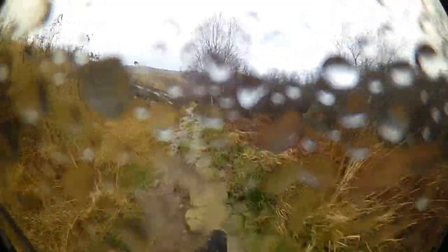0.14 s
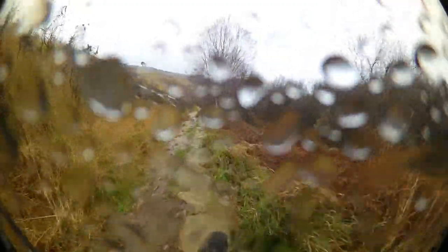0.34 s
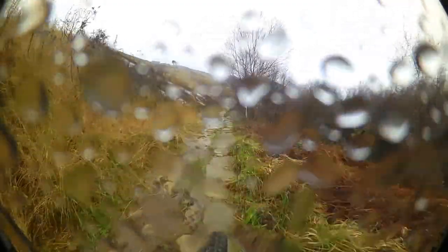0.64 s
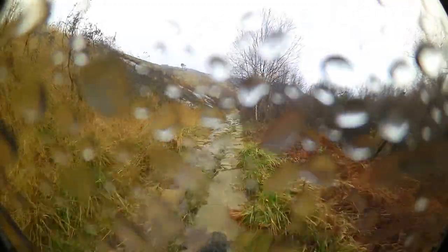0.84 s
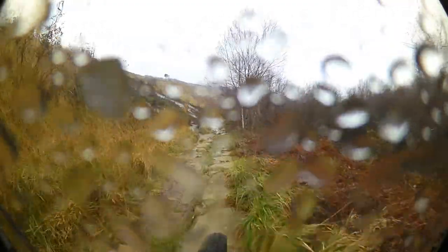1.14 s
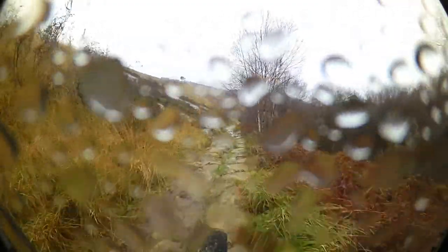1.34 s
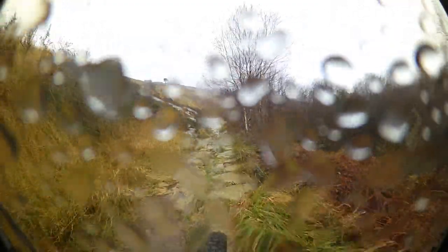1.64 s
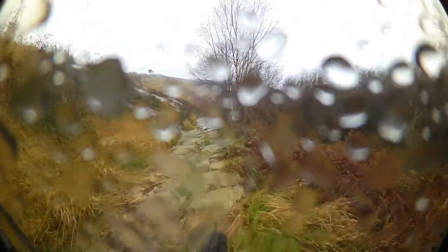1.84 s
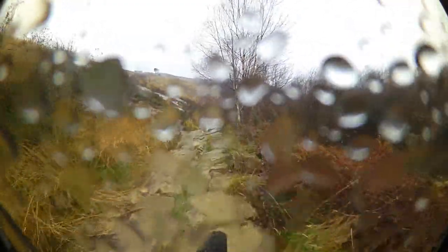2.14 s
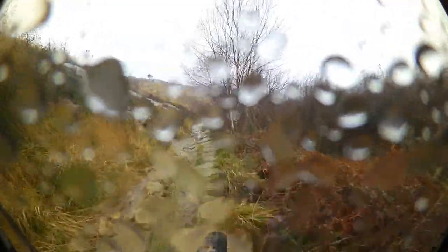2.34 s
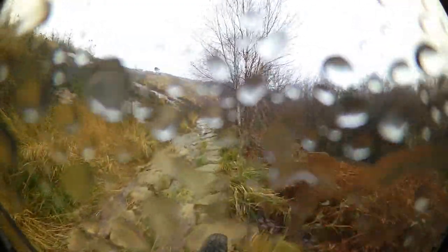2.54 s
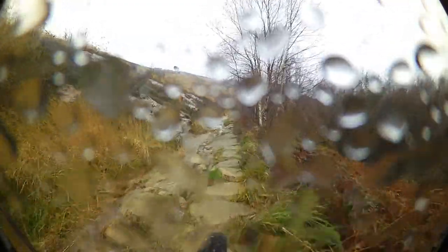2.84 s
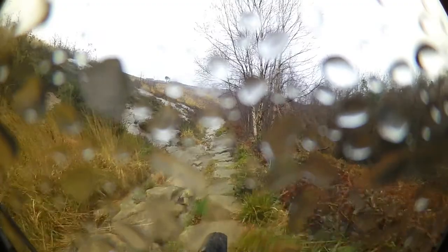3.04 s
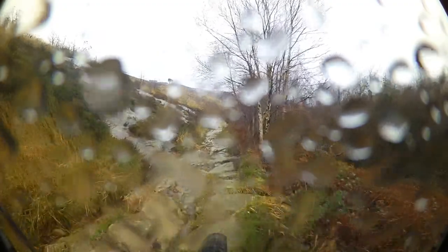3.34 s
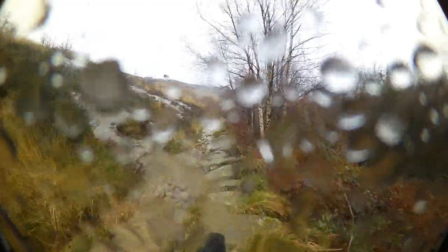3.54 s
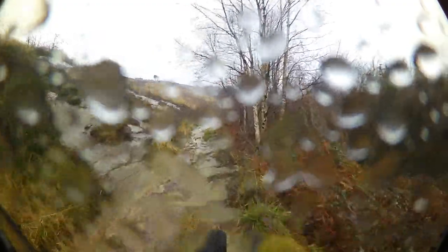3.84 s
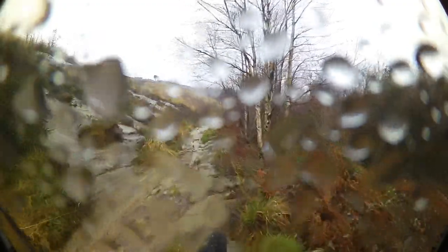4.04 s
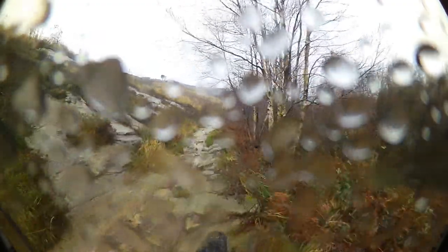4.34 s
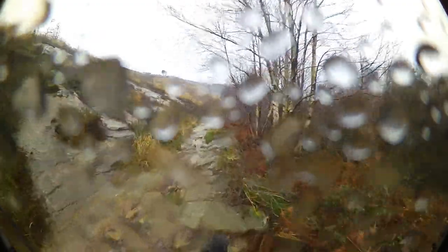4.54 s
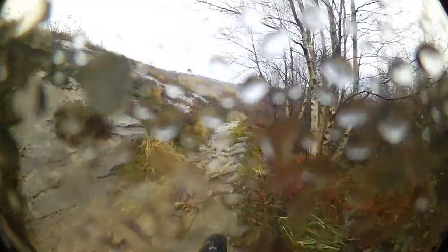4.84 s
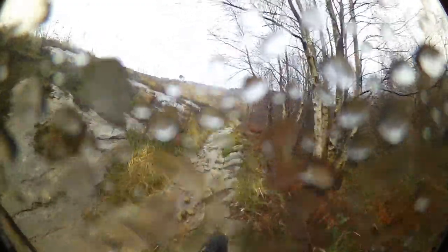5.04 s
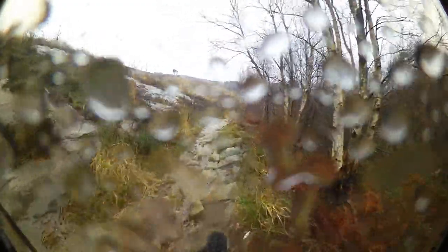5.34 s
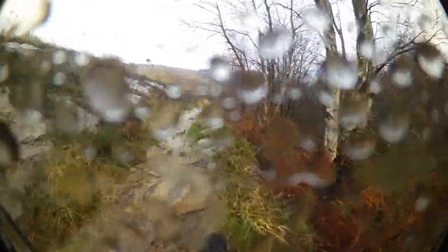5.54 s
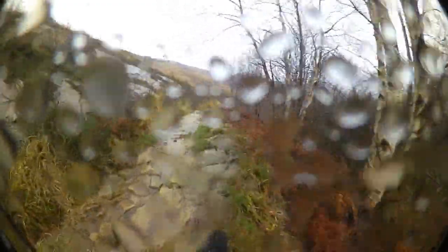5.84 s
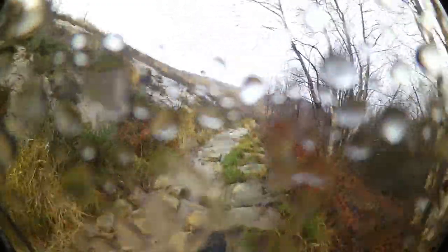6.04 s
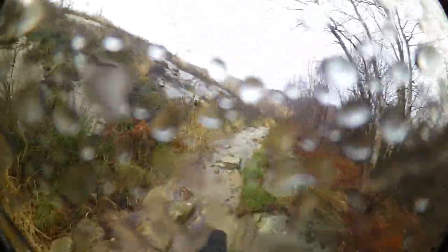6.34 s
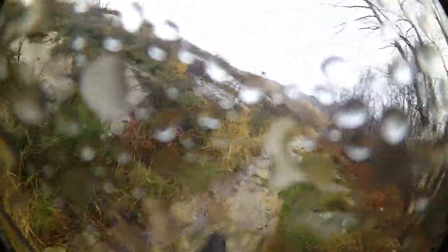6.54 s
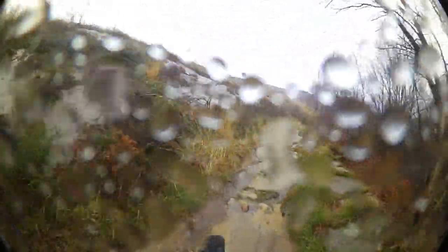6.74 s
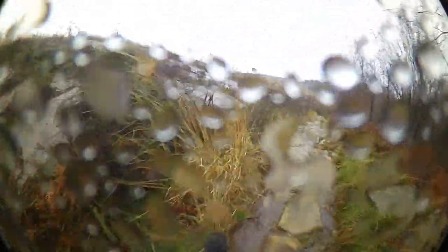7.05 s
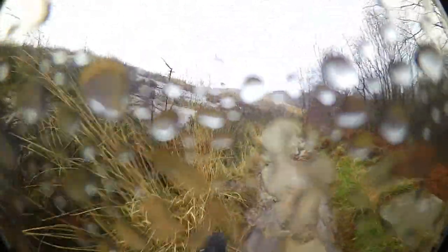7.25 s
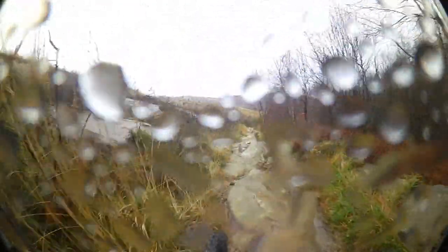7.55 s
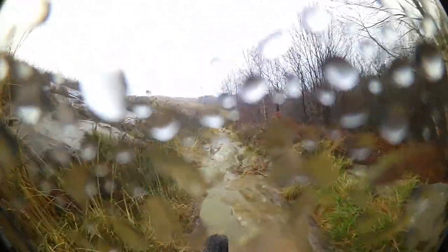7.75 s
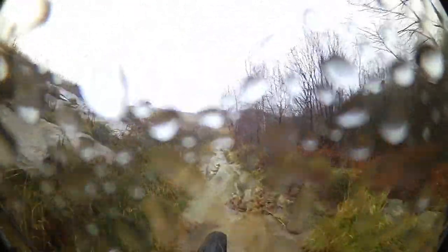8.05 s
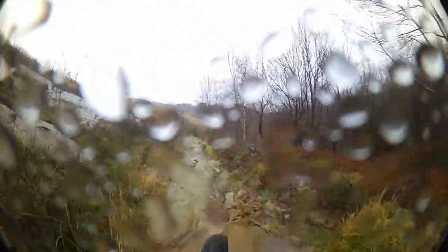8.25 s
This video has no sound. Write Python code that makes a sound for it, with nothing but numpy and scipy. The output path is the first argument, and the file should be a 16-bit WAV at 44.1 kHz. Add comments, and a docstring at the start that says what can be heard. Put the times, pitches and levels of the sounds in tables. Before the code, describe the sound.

Wet bicycle brakes squeal in stuttering bursts while tyres rumble and crunch down a stony trail, stones knocking hard, heard from inside a small case.

```python
"""Down a wet stony trail rolls a mountain bike, heard from inside a small waterproof case on the rider.
Shaped random grains make the tyres rumble and crunch and give short gritty scrapes; stones knock the case modes.
Partials of half the squeal pitch and noise form the stuttering wet brake, with a low disc hum beneath.
Noise bursts tick on the case and the chain jingles; a tyre squeaks once, and later pebbles clack.
A limiter holds the peaks."""
import sys
import numpy as np
from scipy.fft import rfft, irfft, next_fast_len
from scipy.io import wavfile
from scipy.ndimage import uniform_filter1d, minimum_filter1d, map_coordinates

SR = 44100
rng = np.random.default_rng(int(sys.argv[2]) if len(sys.argv) > 2 else 0)


def master(y):
    """Save y as 16-bit WAV."""
    cut = np.clip(np.atleast_2d(y).T, -1, 1)
    pcm = np.round(cut * 32767)  # scale
    wavfile.write(sys.argv[1], SR, pcm.astype(np.int16))


N = 370862


def amp(db):
    """Decibels to gain."""
    return 10 ** (np.asarray(db) / 20)


def unit(x):
    """Scale to rms 1."""
    return x / np.sqrt(np.mean(x ** 2) + 1e-20)


def along(points, hz):
    """Interpolate (f/Hz, value) points on a log frequency axis."""
    f, v = np.transpose(points)
    return np.interp(np.log(hz + 1), np.log(f + 1), v)


def curves(rows):
    """One value per sample for each column after the time."""
    s, *cols = np.transpose(sorted(map(tuple, rows)))
    return [np.interp(np.arange(N) / SR, s, c) for c in cols]


def wobble(rate):
    """A smooth random curve, rate knots a second."""
    knots = rng.standard_normal(int(N * rate / SR) + 4)
    coarse = np.arange(0, N + 16, 16)
    return np.interp(np.arange(N), coarse, map_coordinates(knots, [coarse * rate / SR]))


def filtered(x, response):
    """Shape x by a response of frequency in Hz."""
    m = next_fast_len(N + SR // 4)
    return irfft(rfft(x, m) * response(np.fft.rfftfreq(m, 1 / SR)), m)[..., :N]


def add(track, s, sound):
    """Mix a sound into a track at time s."""
    part = track[..., max(round(s * SR), 0):][..., :sound.shape[-1]]
    part += sound[..., :part.shape[-1]]


def swell(s, length, attack, release, sag=0):
    """Level in dB that rises, holds with a sag in dB/s and dies; attack and release are s per 20 dB."""
    t = np.arange(N) / SR - s
    edges = np.maximum(-t, 0) / attack + np.maximum(t - length, 0) / release
    return -20 * edges - sag * np.clip(t, 0, length)


def grains(rate, spread_db, bed_db):
    """Tiny impacts of uneven size, rate per second, on a bed of noise."""
    size = amp(spread_db * np.minimum(rng.exponential(size=N), 4))
    hits = (rng.random(N) < rate / SR) * size * rng.choice([-1, 1], (2, N))
    return unit(hits) + amp(bed_db) * rng.standard_normal((2, N))


# stereo width of the noisy layers: (f/Hz, left-right likeness)
LIKENESS = [(100, .93), (1000, 0.99), (2500, 1), (4500, 0.84), (12000, .3)]


def coloured(pair, spectrum):
    """Two signals become a coloured stereo pair of rms 1, mixed as mid and side to set the width."""
    def response(hz):
        turn = np.arccos(np.clip(along(LIKENESS, hz), -1, 1)) / 2
        return amp(along(spectrum, hz)) * [np.cos(turn), np.sin(turn)]
    mid, side = filtered(pair, response)
    return unit(np.array([mid + side, mid - side]))


# narrow resonances that colour grit, scrapes and pebbles: (f/Hz, width/Hz, level/dB)
CASE_RESONANCES = [(1220, 100, 12), (1900, 260, 3), (2560, 110, 9)]


def hollow(x):
    """The narrow resonances of the case are added to a sound."""
    def response(f):
        return 1 + sum(amp(db) * 1j * f * w / (hz * hz - f * f + 1j * f * w)
                       for hz, w, db in CASE_RESONANCES)
    return filtered(x, response)


# course of the ride, before layer trims: (t/s, frame rumble level/dB, tyre crunch level/dB, grit level/dB)
RIDE_LEVELS = [(0.0, -32, -40.5, -60), (0.4, -16.5, -30, -52), (0.52, -32, -34.5, -50),
               (0.88, -33, -45.5, -69), (1.26, -24.5, -35, -57.5), (1.38, -33.5, -39, -60),
               (1.88, -38, -49.5, -72.0), (2.68, -29, -38.0, -62), (2.9, -32.5, -37, -57.5),
               (3.12, -31, -41.5, -65), (3.42, -23, -34, -54), (3.68, -32.5, -38.5, -55),
               (3.78, -27, -36, -55.5), (4.68, -37, -49, -71.5), (4.8, -28.5, -37.5, -61),
               (5.3, -24, -32.5, -58.5), (5.84, -35.5, -45.5, -59.5), (6.46, -18.5, -35, -57),
               (6.56, -30, -41.5, -63), (6.9, -26, -40.2, -59.5), (7.0, -21.5, -36, -54.9),
               (7.42, -16, -30.5, -53.5), (7.72, -34.3, -48, -60.5), (7.86, -37, -46.5, -58.5),
               (8.04, -21.5, -38.5, -56.5), (8.4, -31.5, -46.5, -62.5)]
# wheels roll over rocks, before layer trims: (t/s, half length/s, rumble level/dB, crunch level/dB)
ROCK_BUMPS = [(0.117, 0.03, -21, -29), (0.152, .02, -18.5, -37.5), (0.368, .01, -13, -45),
              (0.467, 0.041, -20, -25.5), (1.132, 0.018, -22, -33), (1.28, 0.016, -25.5, -39.5),
              (2.295, 0.013, -30.5, -45), (2.616, 0.022, -25, -43), (3.197, .025, -25.5, -40.5),
              (3.765, 0.0098, -17.5, -36), (4.573, 0.018, -28.5, -40), (4.912, .03, -21.5, -35.5),
              (5.114, 0.032, -21, -35), (5.336, 0.032, -23, -29.5), (5.482, 0.041, -27.5, -34.5),
              (5.663, 0.037, -17.5, -30), (5.801, 0.024, -27.5, -46), (5.988, 0.023, -25.5, -30.5),
              (6.107, 0.013, -24.5, -49.5), (6.309, 0.015, -15.5, -30), (6.408, 0.052, -21.5, -30.5),
              (6.712, .025, -22.5, -37.5), (6.957, .015, -16, -40.5), (7.041, .012, -14, -37),
              (7.189, 0.027, -21, -26.5), (7.366, .025, -17.5, -25), (7.748, 0.026, -31, -53),
              (8.038, 0.016, -18.5, -32.5), (8.127, 0.017, -28.5, -32.5)]
# colour of the frame rumble: (f/Hz, relative density/dB)
RUMBLE_COLOUR = [(20, -50.5), (40, -18.5), (68, -5), (105, -7), (165, 1), (190, 1), (218, 0), (270, -2),
                 (335, -4), (480, -10), (700, -34.5), (1200, -68)]
# colour of the tyre crunch: (f/Hz, relative density/dB)
CRUNCH_COLOUR = [(200, -20.5), (400, 2), (560, 5.5), (750, 2.5), (950, 0), (1180, 4), (1350, -2.5),
                 (1550, -11), (2000, -15.5), (3000, -57)]
# colour of the fine grit: (f/Hz, relative density/dB)
GRIT_COLOUR = [(900, -22.5), (1200, 3.5), (1480, 0), (1800, 2.5), (2250, 2), (2680, -6), (2900, -6),
               (3900, -11), (4700, -11.5), (5800, -23.5), (7000, -24), (8200, -20), (10500, -37),
               (12500, -47), (15800, -59)]


def tyres(crunch_db=7.5, grit_db=13, bump_grit_db=-28, jolt_db=2.5):
    """Knobbly tyres on wet stones: grains in three bands; shared jolts swell them at once."""
    t = np.arange(N) / SR
    rumble, crunch, grit = amp(curves(RIDE_LEVELS))
    rolls = [np.exp(-((t - s) / half) ** 2) for s, half, _, _ in ROCK_BUMPS]
    thump, scrunch = amp(np.transpose(ROCK_BUMPS)[2:]) @ np.array(rolls)
    jolts = jolt_db * wobble(55)

    def layer(source, colour, shake_db):
        return unit(amp(shake_db) * coloured(source, colour))

    frame = layer(grains(rate=470, spread_db=2.5, bed_db=-2.0), RUMBLE_COLOUR, .6 * jolts + 1.6 * wobble(40))
    stones = layer(grains(rate=400, spread_db=4.5, bed_db=2.5), CRUNCH_COLOUR, 1.39 * jolts)
    fine = hollow(grains(rate=350, spread_db=1, bed_db=2.0))
    sand = layer(fine, GRIT_COLOUR, jolts + 2 * wobble(100))
    # ride and bumps add as powers
    frame = np.hypot(rumble, thump) * frame
    stones = np.hypot(crunch, scrunch) * stones
    sand = np.hypot(grit, amp(bump_grit_db) * scrunch) * sand
    return frame + amp(crunch_db) * stones + amp(grit_db) * sand


# drops and grit hit the case, before trim and colour: (t/s, level/dB)
CASE_TICKS = [(0.3149, -28), (0.4545, -34.5), (1.2413, -35.5), (2.2646, -21.5), (2.6946, -41.5),
              (3.193, -37.5), (3.2451, -28.5), (3.398, -18), (3.469, -30), (3.5264, -34), (3.802, -25),
              (4.086, -27.5), (4.135, -23.5), (4.8525, -32.5), (5.1123, -30), (5.404, -39.5),
              (5.5944, -32.5), (5.6654, -38), (5.834, -35), (5.892, -33), (6.065, -47), (6.3468, -27),
              (6.536, -33), (7.0878, -27.5), (7.5516, -26.5), (7.9066, -24.5), (8.33, -38)]
# colour of a tick: (f/Hz, gain/dB)
TICK_COLOUR = [(600, -9), (1200, 7), (1900, 15.5), (2560, 12), (3300, -3.5), (4600, -2.5), (6300, -16),
               (8200, -6.5), (11000, -16), (15800, -19.5)]


def ticks(tick_db=-3, t60=0.023):
    """Drops and grit splat on the case: short noise bursts, mostly alike left and right."""
    out, t = np.zeros((2, N)), np.arange(SR // 10) / SR
    for s, db in CASE_TICKS:
        splat = rng.standard_normal(len(t)) + 0.26 * rng.standard_normal((2, len(t)))
        add(out, s, amp(db + tick_db - 60 * t / t60) * splat)
    return filtered(out, lambda hz: amp(along(TICK_COLOUR, hz)))


# stones jolt the bike: (t/s, peak level/dB before trim, thud/dB, clack/dB, crack/dB)
# thud and clack weight the low and high modes; crack is relative to the peak, before trim and colour
STONE_KNOCKS = [(0.337, -5.5, -11.5, -22, -46), (0.361, -7, 14, -33, -39),
                (0.686, -3.5, -15.5, -12.5, -38.5), (1.303, -5, -22, -9, -28.5),
                (2.262, -24.5, -9, -14, -28), (3.213, -13, -15.5, -20, -37.5), (3.373, -6.5, -9, -16, -45),
                (3.412, -6.5, -9.5, -12, -34), (3.762, -5.5, -12.5, -14.5, -43),
                (3.793, -12, -24, -9.5, -29.5), (3.823, -4, -14.5, -18, -40),
                (4.108, -14.5, -12, -19.5, -33), (4.909, -10.5, -11.5, -21, -59.5),
                (5.319, -6, 3.5, -38, -56), (5.338, -9.5, -21, -16, -39.5), (5.366, -3.5, -10, -17, -35.5),
                (5.432, -11.5, -14, -21, -37.5), (5.698, -6.5, -26, 3, -31.5),
                (5.993, -9.5, -15, -24, -59.5), (6.018, -11.5, -28, 3, -41.5), (6.293, -5, 10, -13, -38.5),
                (6.44, -10.5, 13, -21, -34.5), (6.465, -6.5, -14, -15, -41), (6.757, -10.5, -19, -36, -66),
                (7.033, -6.5, -21, -6, -35.5), (7.207, -8, 5, -4.5, -49), (7.377, -2.5, -19.5, -22, -41),
                (7.492, -8.5, -2, -59, -33.5), (7.545, -11, -11, -41, -33), (7.585, -2, -12, -15, -34),
                (7.905, -22, -13, -22, -37), (8.029, -9.5, -8, -19, -59.5), (8.095, -11, -20.5, -34, -57.5),
                (8.235, -0.5, -12, -19.5, -37.5)]
# modes of the case, before detuning and blow weighting: (f/Hz, t60/s, level/dB)
CASE_MODES = [(209, 0.1, -1.5), (464, 0.0075, 17), (620, 0.0072, 10.5), (1131, 0.02, 9),
              (1240, 0.027, -12.5), (1810, .018, 1), (2386, 0.02, 1.5), (2515, 0.016, -3),
              (3300, 0.0086, -4.5), (4250, 0.017, -20.5)]
# colour of the instant of contact: (f/Hz, gain/dB)
CRACK_COLOUR = [(1000, -21), (3000, -9), (4700, 9), (6500, -6), (8500, -3), (15800, -10.5)]


def knocks(knock_db=1, ring_db=-7, crack_db=6, crack_t60=0.025, lag=.0015, contact=0.001):
    """Each blow is a noise crack together with decaying case modes, weighted by the hardness of contact."""
    rings, cracks, t = np.zeros(N), np.zeros((2, N)), np.arange(SR // 10) / SR
    detune, uneven_db = .015, 2  # random spread of mode pitch (ratio) and level
    for s, db, thud, clack, crack in STONE_KNOCKS:
        force = [(600, thud), (1000, ring_db), (1400, ring_db), (1900, clack)]
        modes = np.zeros(len(t))
        for hz, t60, level in CASE_MODES:
            envelope = amp(level + rng.normal(0, uneven_db) + along(force, hz) - 60 * t / t60)
            modes += envelope * np.sin(2 * np.pi * hz * rng.normal(1, detune) * t)
        modes *= 1 - np.exp(-t / contact)  # soft onset
        add(rings, s + lag, amp(db + knock_db) * modes / np.abs(modes).max())
        burst = rng.standard_normal((2, len(t)))
        add(cracks, s + lag, amp(db + crack + crack_db - 60 * t / crack_t60) * burst)
    return rings + filtered(cracks, lambda hz: amp(along(CRACK_COLOUR, hz)))


# short gritty scrapes, of tyre on stones or, at 4.17 s, of the brake pads:
# (t/s of the middle, half length/s, level/dB)
GRITTY_SCRAPES = [(0.361, 0.016, -32), (3.379, 0.0034, -15.5), (3.781, 0.016, -23.5), (4.171, 0.011, -16.5),
                  (5.353, 0.017, -40.5), (5.704, 0.0038, -21.5), (5.901, 0.0052, -35.5), (6.046, 0.04, -33),
                  (6.294, 0.019, -20.5), (6.464, 0.019, -25), (6.761, 0.008, -32), (7.007, 0.02, -24.5),
                  (7.038, 0.018, -16.5), (7.356, 0.023, -31.5), (7.476, 0.022, -25), (7.578, 0.013, -22.5),
                  (8.097, 0.0074, -34.5)]
# colour of the scrapes, also of pebbles: (f/Hz, relative density/dB)
SCRAPE_COLOUR = [(300, -9.5), (700, -6), (1200, 1.5), (1600, -1), (2500, -12), (3400, -18.5), (4600, -21.5),
                 (6300, -28.5), (8500, -26), (12000, -36.5), (15800, -38)]


def scrapes():
    """Short gritty scrapes: dense grains swell and stop in bell-shaped bursts."""
    t = np.arange(N) / SR
    level = sum(amp(db) * np.exp(-((t - s) / half) ** 2) for s, half, db in GRITTY_SCRAPES)
    return level * coloured(hollow(grains(rate=320, spread_db=8, bed_db=-7)), SCRAPE_COLOUR)


ATTACK_S, RELEASE_S = 0.0055, .02  # the main tone gains and first loses 20 dB at these rates
BITE_ATTACK_S, BITE_RELEASE_S = 0.0074, 0.017  # the same for the overtones, which let go sooner
SAG_DB_PER_S, BITE_SAG_DB_PER_S = 11, 41  # a held grab weakens and dulls
BITE_ARCH_DB, TONE_ARCH_DB = 3.5, 1.5  # a grab weakens this much from its middle to its ends
GLIDE_HZ = 12  # each grab rises this much in pitch
TAIL_DB, TAIL_S = -8, .045  # then the main tone rings on from this level, 20 dB per this time
WIPE_DB, WIPE_S = 6, .035  # a held pad wipes the disc dry: the rasp falls this much, time constant
# wet pads grab the disc, levels before sag and arch:
# (t/s, length/s, main tone f/Hz in the middle, main level/dB, third partial level/dB, bite level/dB)
BRAKE_GRABS = [(0.483, 0.016, 1122, -11, -25, -34.5), (0.503, 0.04, 1137, -11.5, -20, -25),
               (0.544, .013, 1135, -9.5, -16, -21.5), (0.566, .018, 1133, -14, -18.5, -29),
               (.595, 0.035, 1134, -12, -18.5, -22), (0.654, 0.026, 1134, -11.5, -20.5, -26),
               (0.701, 0.013, 1137, -20.5, -28, -33.5), (0.725, 0.019, 1122, -11.5, -19.5, -28),
               (1.286, 0.014, 1122, -20, -34, -41.5), (1.3, 0.043, 1132, -10, -23.5, -22),
               (1.351, 0.02, 1133, -13, -24, -27), (1.388, 0.085, 1135, -11.5, -16, -23),
               (1.467, 0.059, 1131, -16, -25, -32.5), (1.52, 0.13, 1133, -13, -22.5, -24.5),
               (1.649, .043, 1131, -14, -26, -30.5), (1.711, .027, 1126, -14, -28, -24.5),
               (1.756, .048, 1132, -13.5, -25, -25.5), (1.81, 0.18, 1132, -14, -25.5, -27.5),
               (1.987, .018, 1133, -19, -24.5, -41), (2.026, 0.029, 1122, -19.5, -30.5, -39),
               (2.352, .019, 1134, -10.5, -23, -24), (2.391, .02, 1146, -18, -29, -36),
               (2.849, 0.025, 1141, -10, -19, -27), (2.875, 0.052, 1160, -20, -31, -38),
               (2.936, 0.014, 1141, -15.5, -26, -34.5), (2.959, 0.027, 1134, -11, -21.5, -29),
               (3.547, 0.02, 1135, -11.5, -22, -31.5), (3.593, .015, 1149, -10, -18, -28),
               (3.637, .027, 1160, -15.5, -27.5, -36.5), (3.684, .03, 1150, -17, -34, -38.5),
               (3.727, 0.013, 1142, -16.5, -23, -33), (3.776, 0.0075, 1121, -8, -17, -23),
               (3.844, 0.0044, 1142, -13, -23, -33), (3.885, 0.024, 1137, -10.5, -21, -25.5),
               (3.942, 0.023, 1133, -10, -19.5, -20), (3.988, 0.029, 1134, -12.5, -23.5, -24),
               (4.069, 0.0039, 1142, -10.5, -15.5, -24.5), (4.132, .012, 1133, -14, -21.5, -33),
               (4.16, .025, 1128, -11.5, -16.5, -23), (4.233, 0.0074, 1131, -13, -22, -28),
               (4.285, 0.011, 1138, -13, -25.5, -30), (4.32, 0.026, 1139, -24.5, -34.5, -46.5),
               (4.405, 0.0074, 1145, -34, -44, -55), (4.439, .03, 1155, -30, -60, -66),
               (5.685, 0.01, 1155, -16, -31, -36.5)]


def grip():
    """Pitch, main, third, bite and scrape levels of the squeal; the strongest grab rules the disc."""
    t = np.arange(0, N, 32) / SR
    s, length, hz, main, third, bite = np.transpose(BRAKE_GRABS)[..., None]
    early, held, late = np.maximum(s - t, 0), np.clip(t - s, 0, length), np.maximum(t - s - length, 0)
    place = 2 * held / length - 1  # -1 at the start of a grab, 1 at its end
    dying = np.maximum(-20 * late / RELEASE_S, TAIL_DB - 20 * late / TAIL_S)
    main = main - 20 * early / ATTACK_S - SAG_DB_PER_S * held - TONE_ARCH_DB * place ** 2 + dying
    edge = -20 * (early / BITE_ATTACK_S + late / BITE_RELEASE_S)
    edge = edge - BITE_SAG_DB_PER_S * held - BITE_ARCH_DB * place ** 2
    scrape = bite + edge - WIPE_DB * (1 - np.exp(-held / WIPE_S))
    pitch = (hz + GLIDE_HZ * place / 2)[main.argmax(axis=0), np.arange(len(t))]
    levels = np.max([main, third + edge, bite + edge, scrape], axis=1)
    return curves(np.column_stack([t, pitch, *levels]))


HUM_ATTACK_S, HUM_RELEASE_S, HUM_SAG_DB_PER_S = 0.06, 0.14, 17.5  # s per 20 dB; fading while held
RIVAL_DB, RIVAL_SHARE = -16, .9  # a main tone above this level starves the hum by this share of the dB
# pulls of the brake lever, before trim: (t/s, length/s, level/dB)
LEVER_PULLS = [(0.462, .25, -17.5), (1.272, .45, -21.5), (1.975, .09, -25), (2.34, .11, -22),
               (2.855, .14, -20.5), (3.522, .17, -26), (3.719, .27, -20), (4.019, 0.41, -30),
               (4.369, 0.16, -36.5), (5.7, .1, -34)]


def disc(disc_hz=568, disc_db=-2, drift=0.0069, flutter_db=3, second_hz=1145, second_db=-36, second_share=.4):
    """The disc's lowest mode hums in each pull, yields to strong squeal; its second sings faintly along."""
    hums = [db + swell(s, length, HUM_ATTACK_S, HUM_RELEASE_S, HUM_SAG_DB_PER_S)
            for s, length, db in LEVER_PULLS]
    starved = RIVAL_SHARE * uniform_filter1d(np.maximum(grip()[1] - RIVAL_DB, 0), size=SR // 80)
    level = np.max(hums, axis=0) - starved
    touching = np.max([swell(s, length, HUM_ATTACK_S, HUM_RELEASE_S * second_share)
                       for s, length, _ in LEVER_PULLS], axis=0)

    def ring(hz):
        flutter = np.sqrt(2) * amp(flutter_db * wobble(60))
        return flutter * np.sin(2 * np.pi * np.cumsum(hz * (1 + drift * wobble(60))) / SR)

    return amp(level + disc_db) * ring(disc_hz) + amp(touching + second_db) * ring(second_hz)


# upper partials at a neutral bite: (multiple of half the main pitch, level/dB re bite)
SQUEAL_OVERTONES = [(4, -2), (5, -12.5), (6, -16), (7, -26.5), (8, -22), (9, -31.5), (10, -32), (11, -41.5),
                    (12, -41.5), (13, -40.5), (14, -45), (15, -41.5), (16, -41.5)]
# colour of the pad friction: (f/Hz, relative density/dB)
RASP_COLOUR = [(300, -23.5), (700, -30.5), (1200, -7), (2400, -1), (3200, -15), (4600, -21.5), (6500, -30),
               (8500, -26), (12000, -30.5), (15800, -31.5)]


def squeal(jitter=.0038, rasp_db=-5, flutter_db=0.99, upper_flutter_db=3, hard_db=-25, steepen=.045,
           rasp_growth=0.94, uneven_db=2):
    """Pads stick and slip: the disc's second mode sings, with partials at multiples of half its pitch."""
    # smoothed, as the disc cannot change at once
    tone_hz, main, third, bite, scrape = uniform_filter1d(np.array(grip()), size=SR // 300)
    bite = bite + uneven_db * wobble(45)  # the wet pads bite unevenly
    phase = np.pi * np.cumsum(tone_hz * (1 + jitter * wobble(160))) / SR  # of half the pitch

    def partial(k, db, shake_db):
        level = np.sqrt(2) * amp(db + shake_db * wobble(170))
        return level * np.sin(k * phase + shake_db / 10 * wobble(120))

    tone = partial(2, main, flutter_db) + partial(3, third, upper_flutter_db)
    # a harder bite sharpens each slip, so high overtones and rasp grow further
    force = np.clip(bite - hard_db, -20, 4)
    lowest = SQUEAL_OVERTONES[0][0]
    for k, db in SQUEAL_OVERTONES:
        tone = tone + partial(k, bite + db + steepen * (k - lowest) * force, upper_flutter_db)
    slips = rng.standard_normal((2, N)) * (1 + 0.31 * np.sin(phase))
    rasp_level = amp(scrape + rasp_db + rasp_growth * force + 1.5 * wobble(70))
    return tone + rasp_level * coloured(slips, RASP_COLOUR)


# the chain jingles: (t/s, peak level/dB before trim)
CHAIN_JINGLES = [(3.244, -65), (4.8409, -62), (4.9444, -47), (5.1761, -43.5), (6.0092, -69), (6.4882, -48),
                 (7.6076, -58)]


def chain(ring_hz=8200, width_hz=350, jingle_db=-11, rise=0.0073):
    """Links shiver together: narrow high noise that peaks after the rise time (s) and dies."""
    level, t = np.zeros(N), np.arange(SR // 10) / SR
    for s, db in CHAIN_JINGLES:
        add(level, s, amp(db + jingle_db) * t / rise * np.exp(1 - t / rise))
    noise = rng.standard_normal((2, N))
    return level * unit(filtered(noise, lambda hz: 1 / (1 + ((hz - ring_hz) / width_hz) ** 2)))


SQUEAK_S, SQUEAK_LENGTH_S, SQUEAK_HZ, SQUEAK_RISE_HZ = 3.25, 0.087, 1260, 151.8


def squeak(jitter=0.03, flutter_db=5, squeak_db=-25, attack=0.0071, release=.02, sag=130):
    """Rubber slides briefly on a wet slab with an unsteady note that rises and levels off."""
    slid = np.clip((np.arange(N) / SR - SQUEAK_S) / SQUEAK_LENGTH_S, 0, 1)
    hz = (SQUEAK_HZ + SQUEAK_RISE_HZ * slid * (2 - slid)) * (1 + jitter * wobble(300))
    level = squeak_db + swell(SQUEAK_S, SQUEAK_LENGTH_S, attack, release, sag) + flutter_db * wobble(220)
    return amp(level) * np.sin(2 * np.pi * np.cumsum(hz) / SR)


PEBBLES_PER_S = 7.1
GRAVEL_S = 5.7  # from here the trail is loose and throws up pebbles


def pebbles(pebble_db=-7, growth=0.42):
    """Loose pebbles clack on the frame at random, harder when the tyres crunch more."""
    crunch = curves(RIDE_LEVELS)[1]
    hits = (rng.random(N) < PEBBLES_PER_S / SR) * rng.choice([-1, 1], (2, N))
    level = amp(pebble_db + crunch.mean() + growth * (crunch - crunch.mean()))
    level = level * (np.arange(N) / SR > GRAVEL_S)
    return level * coloured(hollow(hits), SCRAPE_COLOUR)


# phase turned by the case between its two ports: (f/Hz, phase/rad)
PORT_PHASE = [(100, 0.015), (800, 0.42), (1130, 0.1), (2400, 0.24), (4000, 0.88), (8000, 1.49),
              (15000, 2.2)]
# level difference of the ports: (f/Hz, left minus right/dB)
PORT_TILT = [(100, .1), (800, 0), (1130, -2.6), (2200, -1.5), (4000, .2), (8000, -.2), (12000, -2.4)]


def scene():
    """All sources reach the two ports through the case, which splits level and phase between them."""
    bike = tyres() + ticks() + knocks() + scrapes() + disc() + squeal() + chain() + squeak() + pebbles()
    sides = np.array([[.5], [-.5]])

    def ports(hz):
        return amp(sides * along(PORT_TILT, hz)) * np.exp(1j * sides * along(PORT_PHASE, hz))

    return filtered(bike, ports)


TOP_HZ = 15830


def record(dry):
    """Bass cut, a fast look-ahead limiter, then a steep treble cut."""
    ceiling, hold, bass_hz = .92, .002, 35  # hold in s
    dry = filtered(dry, lambda hz: hz ** 2 / (hz ** 2 + bass_hz ** 2))
    need = np.minimum(1, ceiling / (np.abs(dry).max(axis=0) + 1e-9))
    span = int(hold * SR) + 1
    gain = uniform_filter1d(minimum_filter1d(need, span), span)
    return filtered(dry * gain, lambda hz: hz < TOP_HZ)


dry = scene()
out = record(dry)
master(out)
```